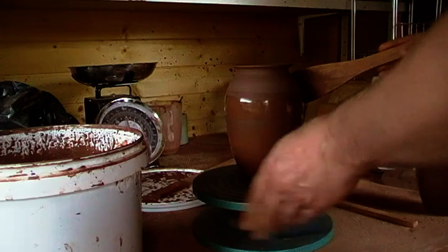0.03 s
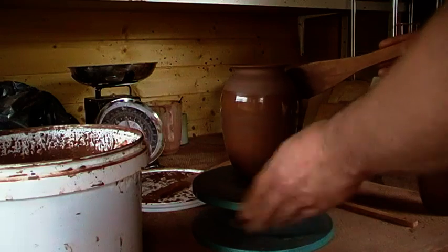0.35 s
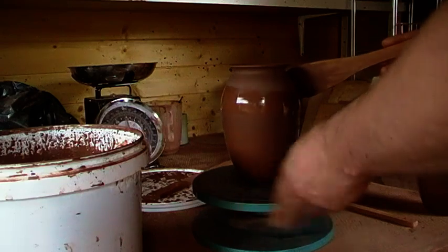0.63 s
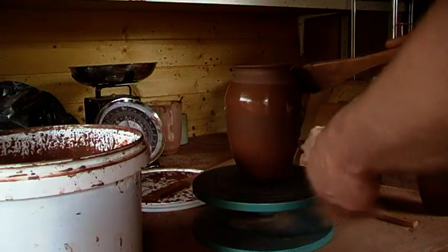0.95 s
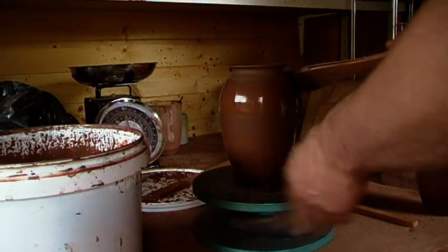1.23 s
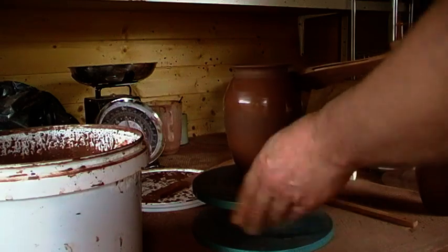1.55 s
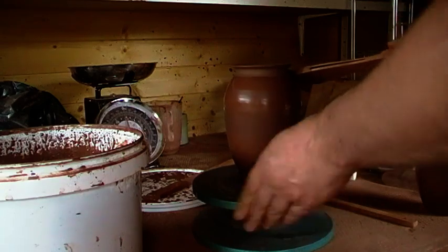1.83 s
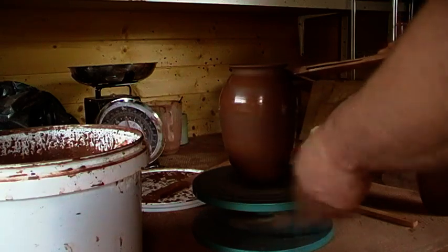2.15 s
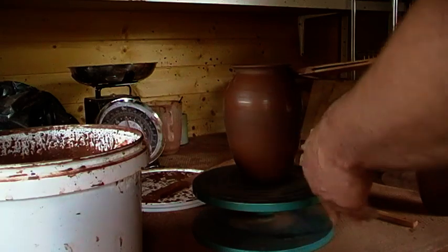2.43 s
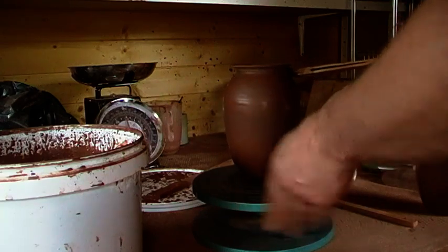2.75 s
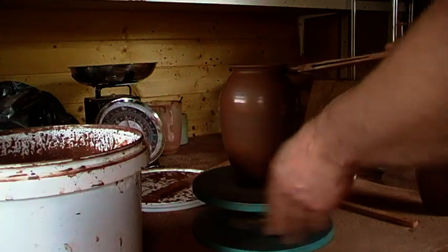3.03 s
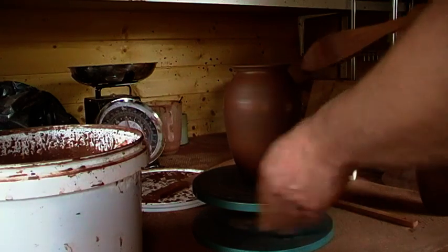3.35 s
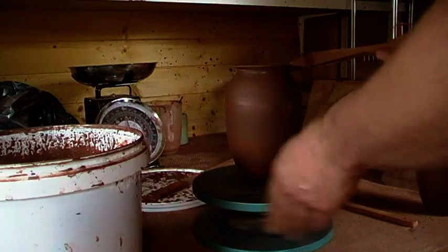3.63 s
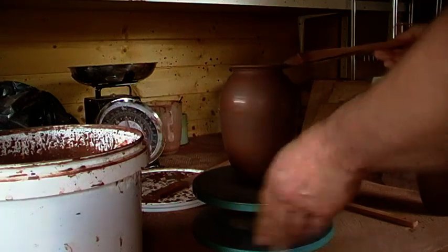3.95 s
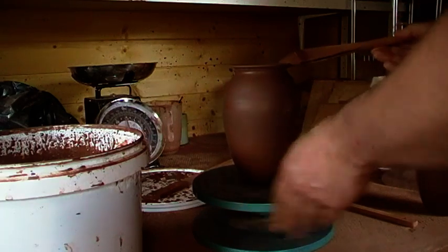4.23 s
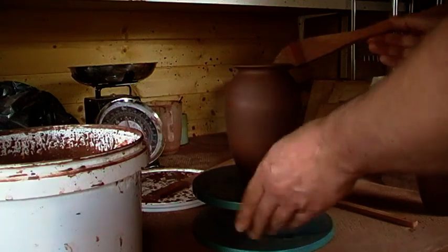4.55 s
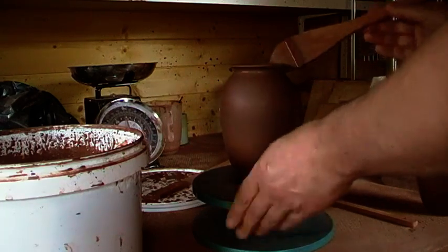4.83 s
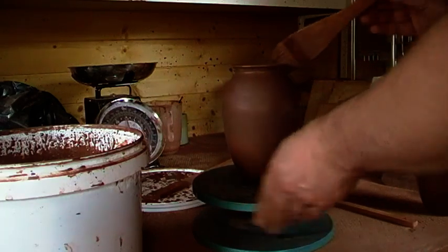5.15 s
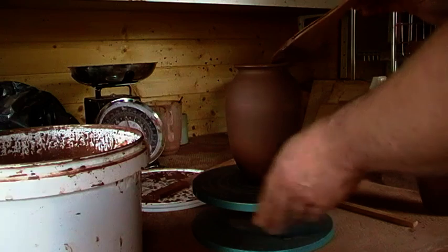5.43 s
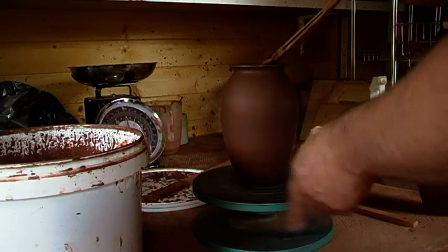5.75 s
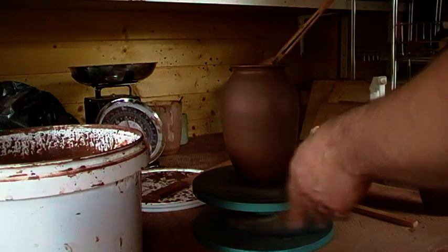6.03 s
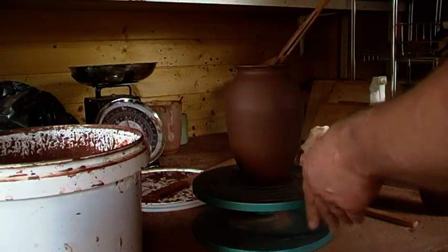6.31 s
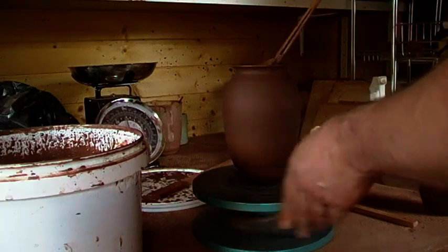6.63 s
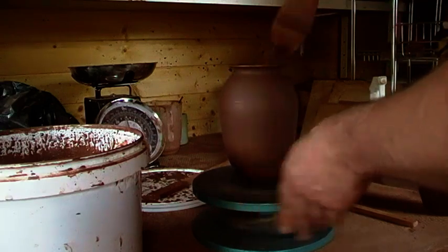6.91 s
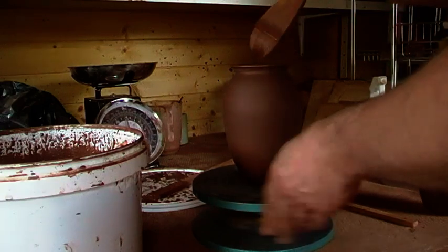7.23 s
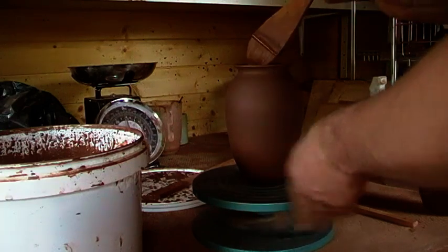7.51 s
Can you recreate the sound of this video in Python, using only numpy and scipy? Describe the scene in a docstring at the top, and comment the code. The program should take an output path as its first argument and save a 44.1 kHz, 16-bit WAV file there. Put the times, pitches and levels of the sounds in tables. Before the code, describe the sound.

A metal potter's turntable, pushed round by hand, knocks and rattles in short uneven bursts with a faint ring in a small workshop.

```python
"""In a small timber workshop, a hand pushes a metal banding wheel (a turntable) round in short strokes.
At each push its head, the turning plate, rocks on its loose spindle and knocks a few times,
shaking the stand and the bench. Fingers sliding on the rim make the head sing faintly, like a bell.
The walls add a short echo. Under it all lie a low rumble, a soft hiss and a thin electrical whine."""
import sys
import numpy as np
from scipy import signal
from scipy.fft import rfft, irfft, next_fast_len
from scipy.io import wavfile
from scipy.ndimage import uniform_filter1d

SR = 44100
rng = np.random.default_rng(int(sys.argv[2]) if len(sys.argv) > 2 else 0)


def persist_wave(psi):
    """Save psi, clipped to +-1, as 16-bit WAV."""
    counts = np.round(np.clip(psi, -1, 1) * 32767).astype(np.int16)
    wavfile.write(sys.argv[1], SR, np.atleast_2d(counts).T)


N = 343098
T = np.arange(N) / SR

# finger strokes on the rim, about four a second: (time [s], bright ring [dB], low hum [dB])
FINGER_STROKES = [(0.0, -68, -53.5), (0.192, -66, -54.5), (0.443, -52, -46.5), (0.705, -55.5, -53),
                  (0.962, -56, -62), (1.18, -60, -59.5), (1.441, -51, -49.5), (1.714, -58, -50.5),
                  (1.952, -66, -69), (2.196, -57, -51.5), (2.45, -61.5, -59), (2.7, -58, -66.5),
                  (2.93, -64, -54), (3.168, -58.5, -56), (3.521, -61, -66), (3.826, -58.5, -57.5),
                  (4.092, -63.5, -53.5), (4.419, -59.5, -59), (4.701, -52.5, -67), (4.955, -62, -54),
                  (5.243, -55.5, -57.5), (5.483, -60.5, -59), (5.739, -63, -63.5), (6.028, -53.5, -56),
                  (6.318, -56.5, -63.5), (6.56, -56.5, -63), (6.833, -56, -66.5), (7.089, -72, -64),
                  (7.39, -66, -64.5), (7.705, -60, -65.5)]
# how alike the wheel sounds on the left and right: (frequency [Hz], likeness [1 = the same])
WHEEL_STEREO = [(200, 1), (1200, 0.95), (2500, 0.76), (5000, 0.88)]
SOFT_KNOCK_DB = -33.5   # the force that counts as a soft knock


def from_db(db):
    """Turn decibels into a number to multiply a sound by."""
    return 10 ** (np.asarray(db) / 20)


def rms_one(x):
    """Scale a signal so that its average size (rms) is 1."""
    return x / np.sqrt(np.mean(x ** 2) + 1e-20)


def at_hz(points, hz):
    """Read between the rows of a (frequency, value) table, with octaves evenly spaced."""
    freqs, values = np.transpose(points)
    return np.interp(np.log(np.maximum(hz, 1)), np.log(freqs), values)


def add(track, sound, time_s):
    """Mix a two-row sound into a track at the given time."""
    start = max(0, int(time_s * SR))
    track[:, start:start + sound.shape[1]] += sound[:, :max(0, N - start)]


def fade(t, t60):
    """A fade that falls by 60 dB every t60 seconds."""
    return np.exp(-np.log(1000) * t / t60)


def drift(rate_hz):
    """A smooth random wobble of size about 1; a higher rate wobbles faster."""
    step = 20   # samples between random points
    size = next_fast_len(N // step + 2)
    hz = np.arange(size // 2 + 1) * SR / step / size
    slow = irfft(rfft(rng.standard_normal(size)) / (1 + (hz / rate_hz) ** 2), size)
    return np.interp(np.arange(N) / step, np.arange(size), rms_one(slow))


def noise(colour, likeness, size):
    """Stereo noise shaped by two tables: level and left-right likeness at each frequency."""
    hz = np.arange(size // 2 + 1) * SR / size
    common, side = rfft(rng.standard_normal((2, size)))
    alike = np.clip(at_hz(likeness, hz), -1, 1)
    pair = np.sqrt((1 + alike) / 2) * common + np.sqrt((1 - alike) / 2) * side * [[1], [-1]]
    return irfft(pair * from_db(at_hz(colour, hz)), size)


def tone(hz, waver_hz, flutter_db):
    """A pure stereo tone whose pitch and loudness wobble a little."""
    phase = 2 * np.pi * np.cumsum(hz + waver_hz * drift(19.1)) / SR
    level = np.sqrt(2) * from_db(flutter_db * drift(18))
    stereo_shift = 0.36 * drift(0.54) * np.array([[1], [-1]])
    return level * np.sin(phase + stereo_shift)


def blow_colour(hardness_db, extra_thud_db, edge_db):
    """A harder blow is shorter, so it sounds brighter. Gives rows of (frequency [Hz], boost [dB])."""
    thud = 7 - 0.54 * hardness_db + extra_thud_db
    clack = -4 + 0.55 * hardness_db + edge_db
    ping = -5 + 0.4931 * hardness_db + edge_db
    return [(450, thud), (800, 0), (1400, 0), (2000, clack), (3000, clack), (4600, ping)]


def body_ring(blow, t, scatter_db=4.0, build_cycles=0.66):
    """A blow makes the stand, head and bench ring at their own natural notes."""
    # the natural notes: (frequency [Hz], level [dB], time to fade by 60 dB [s])
    body_notes = [(227.1, -27, 0.56), (292.5, -26.5, 0.2), (349.8, -25.5, 0.36), (439.2, -11.5, 0.21),
                  (561, -25, 0.24), (730.6, -8, 0.15), (795.6, -12.5, 0.19), (959.5, -6, 0.057),
                  (1118.2, -0.5, 0.13), (1152, -5.5, 0.13), (1215.7, -7.5, 0.17), (1300.3, 0.5, 0.09),
                  (1362.6, -7.5, 0.15), (1645, -15, 0.13), (2104, -11.5, 0.048), (2220, -13.5, 0.036),
                  (2786, -15.5, 0.041), (3050, -14, 0.03), (4770, -9, 0.059), (4907, -10, 0.024)]
    hz, note_db, t60 = np.transpose(body_notes)
    cycles = hz[:, None] * t
    # the heavy bench takes a few cycles to get moving, so low notes start later
    build_up = 1 - np.exp(-cycles / build_cycles)
    swing = np.exp(2j * np.pi * cycles) * fade(t, t60[:, None]) * build_up
    # the point of contact moves round the spindle, so each knock shares its energy out differently
    strength = from_db(note_db + scatter_db * rng.standard_normal(len(hz)))
    strength *= np.linalg.norm(from_db(note_db)) / np.linalg.norm(strength)
    strength *= from_db(at_hz(blow, hz))
    stereo_shift = np.arccos(np.clip(at_hz(WHEEL_STEREO, hz), 0, 1)) / 2
    phase = rng.uniform(0, 2 * np.pi, len(hz))
    phase = phase + stereo_shift * rng.standard_normal(len(hz)) * [[1], [-1]]
    return ((strength * np.exp(1j * phase)) @ swing).imag   # add up the notes for each ear


def clatter(blow, t, rise_s=0.00037, t60=0.091, bounce_s=0.006, bounce_db=-4):
    """Loose parts clatter in a short burst of noise and bounce once."""
    # tone colour of the loose parts: (frequency [Hz], level [dB])
    parts_colour = [(45, -45), (115, -34), (205, 0.5), (300, 4.5), (430, 4), (600, 5), (850, 6.5),
                    (1150, 8.5), (1550, 2.5), (2200, -7), (3000, -12.5), (3700, -17), (4400, -9.5),
                    (4850, -12), (5600, -26), (11000, -34)]
    colour = [(hz, db + at_hz(blow, hz)) for hz, db in parts_colour]
    gap_s = bounce_s * rng.uniform(0.25, 2.05)
    hit, bounce = (np.clip(age / rise_s, 0, 1) * fade(np.abs(age), t60) for age in (t, t - gap_s))
    return noise(colour, WHEEL_STEREO, len(t)) * np.hypot(hit, from_db(bounce_db) * bounce)


def knock(blow, ring_db=-7, clatter_db=-6):
    """One knock is a ring and a clatter together."""
    t = np.arange(SR // 3) / SR
    return from_db(ring_db) * body_ring(blow, t) + from_db(clatter_db) * clatter(blow, t)


def rocking_head(rebound_s=0.018, dull_db=-8, dull_above_hz=1700):
    """The head strikes its spindle, then rocks back with a weaker, duller second touch."""
    # knocks on the spindle: (time [s], force [dB], extra bench thud [dB], extra metal edge [dB])
    spindle_knocks = [(0.001, -31.5, 2.5, 3), (0.025, -22.5, 2, -2), (0.083, -27, -2, -4.5),
                      (0.206, -27.5, 2.5, -1), (0.457, -18.5, -4, -12), (0.463, -18, 4, 1),
                      (0.512, -29.5, -12, 5), (0.714, -25.5, -1, -3), (0.782, -25.5, -4, -5),
                      (0.809, -30, -8, 3), (0.861, -32.5, 1, -6), (0.967, -38.5, -2, 5),
                      (1.212, -32.5, 3.5, 7), (1.305, -34, -2, -2), (1.459, -27, 4, 1.5),
                      (1.526, -22.5, 5, 3.5), (1.56, -21, -10, -1.5), (1.725, -28.5, 2.5, -3),
                      (2.175, -42, 0, -4), (2.222, -21, 1.5, -3), (2.268, -31.5, -1.5, 0),
                      (2.308, -20.5, -4.5, 0.5), (2.469, -36.5, 1.5, -6), (2.517, -34.5, 1, -1),
                      (2.935, -46, -6.5, 2), (3.095, -37, -2.5, -15), (3.163, -43, 2, 0),
                      (3.204, -22.5, 3.5, -2), (3.253, -28.5, -2.5, -3), (3.281, -26, -11, 5),
                      (3.329, -35.5, -0.5, 0), (3.577, -50, -0.5, 0), (3.627, -50.5, 0.5, 0),
                      (3.679, -49.5, -5, 6), (3.84, -33, 2.5, 0), (3.858, -30, -1.5, 3.5),
                      (3.902, -29, -1.5, 1.5), (3.945, -32, 0.5, -12), (4.136, -31, -2.5, -3),
                      (4.183, -28, -6, 0.5), (4.214, -29.5, 1.5, 2.5), (4.736, -53, -0.5, 0),
                      (4.963, -34, -0.5, -1), (5.003, -25.5, -1, -2.5), (5.049, -29.5, 1, 0),
                      (5.088, -29, -8, 6), (5.164, -29, -1.5, -2), (5.31, -35.5, 2, 1), (5.401, -48, 1, -7),
                      (5.778, -28.5, -1, -1), (5.842, -27.5, -3.5, -1.5), (6.061, -36, 2, 0),
                      (6.105, -28, 0, 2.5), (6.162, -20, -1, -2), (6.321, -36, 0.5, -6),
                      (6.574, -42.5, 1, -3), (6.706, -39, -3, -4), (6.86, -36.5, 3, -3),
                      (6.915, -29.5, 0.5, -4), (7.127, -32.5, -5, 2.5), (7.182, -29.5, -3, -2),
                      (7.233, -33.5, -4, -0.5), (7.28, -36, 0.5, -6), (7.439, -41.5, 2, 11),
                      (7.59, -42, -4, 9)]
    track = np.zeros((2, N))
    for time_s, force_db, extra_thud_db, edge_db in spindle_knocks:
        hardness_db = force_db - SOFT_KNOCK_DB
        blow = blow_colour(hardness_db, extra_thud_db, edge_db)
        add(track, from_db(force_db) * knock(blow), time_s)
        dull_blow = [(hz, db + dull_db * (hz > dull_above_hz)) for hz, db in blow]
        # the rebound counts for more after a soft knock, which becomes a loose rattle
        rebound_db = force_db - 8 - 0.184 * hardness_db
        add(track, from_db(rebound_db) * knock(dull_blow), time_s + rebound_s * rng.uniform(0.5, 1.5))
    return track


def low_hum(hz, lag_s=0.021, settle_s=0.016, t60=2.9):
    """The head's lowest note is heavy: each stroke eases it to a new level, then it slowly fades."""
    level = np.zeros(N)
    for time_s, _, hum_db in FINGER_STROKES:
        start = int((time_s + lag_s) * SR)
        level[start:] = from_db(hum_db) * fade(T[:N - start], t60)
    smoothing = np.exp(-1 / (settle_s * SR))
    eased_level = signal.lfilter([1 - smoothing], [1, -smoothing], level)
    return eased_level * tone(hz, waver_hz=1.93, flutter_db=1.0)


def singing_head(swell_s=0.022, touch_s=0.058, t60=0.6, beat_hz=9.8, twin_db=-9, scratch=0.39):
    """Rubbing fingers make the head's bell notes swell; they ring on when the fingers leave."""
    # the head's bell notes, lowest first: (frequency [Hz])
    bell_notes = [1670, 3258, 5464, 8150, 9520, 11290]
    hum_hz, ring_hz, *high_hz = bell_notes
    t = np.arange(SR // 2) / SR
    since_release = np.maximum(t - touch_s, 0)
    swell = np.minimum(t / swell_s, 1) * fade(since_release, t60)
    # the head is not quite round: a note has a close twin, so it pulses as it fades
    twin = from_db(twin_db)
    pulsing = np.abs(1 + twin * np.exp(2j * np.pi * beat_hz * since_release)) / (1 + twin)
    levels, rubbing = np.zeros((2, N)), np.zeros(N)
    for time_s, ring_db, hum_db in FINGER_STROKES:
        high_db = -63 + 0.41 * (hum_db + 54.5)   # the high notes partly follow the hum's level
        add(levels, from_db([[ring_db], [high_db]]) * swell * pulsing, time_s)
        rubbing += np.exp(-np.minimum((2 * (T - time_s) / touch_s) ** 2, 20))
    ring_level, high_level = levels
    grip = 1 + scratch * rubbing * drift(150)   # skin sticks and slips as the stroke begins
    hum = low_hum(hum_hz)
    ring = ring_level * tone(ring_hz, waver_hz=7.46, flutter_db=3.5)
    shimmer = sum(from_db(db) * tone(hz, waver_hz=8.07, flutter_db=4.0)
                  for hz, db in zip(high_hz, (-3, -12, -18, -15)))
    return hum + grip * (ring + high_level * shimmer)


def background_noise(level_db=-58.5):
    """A steady low rumble and soft hiss, slightly stronger near 300 Hz, with faint noisy bands near the head's
    bell notes at 1700 and 3300 Hz."""
    # tone colour of the background: (frequency [Hz], level [dB])
    background_colour = [(12, -31), (20, 4), (110, -11.5), (219, -4.5), (344, -4), (651, -11.5),
                         (1230, -11), (1570, -16.5), (1700, -12.5), (1890, -14.5), (3040, -15.5),
                         (3300, -14), (3570, -14), (7930, -17.5), (11500, -21.5), (15000, -124),
                         (22000, -120)]
    # how alike it sounds on the left and right: (frequency [Hz], likeness [1 = the same])
    background_stereo = [(30, 0.96), (300, 0.86), (1200, 0.35), (3500, 0.37), (7000, 0), (11000, 0.14)]
    rumble_and_hiss = noise(background_colour, background_stereo, next_fast_len(N))[:, :N]
    return from_db(level_db) * rms_one(rumble_and_hiss)


def electrical_whine(hz=7800, level_db=-79):
    """A thin, high electrical tone that never stops."""
    return from_db(level_db) * tone(hz, waver_hz=2.3, flutter_db=-0.5)


def wall_echoes(sound, boost_db=1.5, first_echo_s=0.00822):
    """The timber walls throw back a blur of echoes; the low ones last longest."""
    # tone colour of the echoes: (frequency [Hz], level [dB])
    echo_colour = [(60, -9), (190, 4), (310, 6.5), (500, -6.5), (750, -7.5), (1200, -9.5), (2500, -10),
                   (11000, -18)]
    # how long they last: (frequency [Hz], time to fade by 60 dB [s])
    echo_fades = [(150, 0.39), (350, 0.34), (700, 0.32), (1200, 0.2), (5000, 0.24)]
    size = SR * 3 // 4
    t, hz = np.arange(size) / SR, np.arange(size // 2 + 1) * SR / size
    echo_noise = rfft(noise(echo_colour, WHEEL_STEREO, size))
    band_hz, band_t60 = np.transpose(echo_fades)
    spectrum = 0
    for share, t60 in zip(np.eye(len(band_hz)), band_t60):   # each band fades at its own speed
        band = irfft(echo_noise * at_hz(list(zip(band_hz, share)), hz), size)
        spectrum = spectrum + rfft(band * fade(t, t60) * (t > first_echo_s))
    # even out the echo's spectrum so no single note rings out
    power = np.mean(np.abs(spectrum) ** 2, axis=0)
    evened = spectrum / np.sqrt(uniform_filter1d(power, size=15))
    echo_tail = irfft(evened * from_db(boost_db + at_hz(echo_colour, hz)), size)
    return signal.fftconvolve(sound, echo_tail, axes=1)[:, :N]


def scene():
    """The knocks, their echoes and the singing head over the quiet background."""
    knocks = rocking_head()
    background = background_noise() + electrical_whine()
    return knocks + wall_echoes(knocks) + singing_head() + background


def record(dry):
    """A steep filter cuts away the highest treble."""
    cutoff_hz = 11500
    return signal.sosfilt(signal.ellip(10, 0.2, 80, cutoff_hz, fs=SR, output="sos"), dry)


dry = scene()
out = record(dry)
persist_wave(out)
```